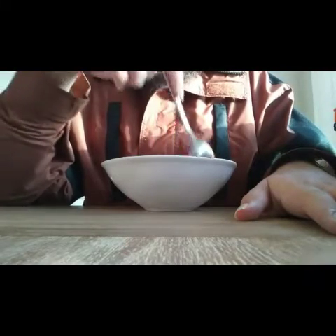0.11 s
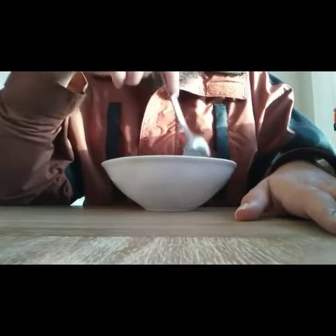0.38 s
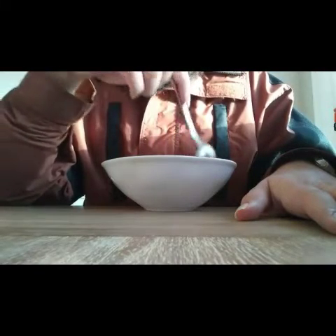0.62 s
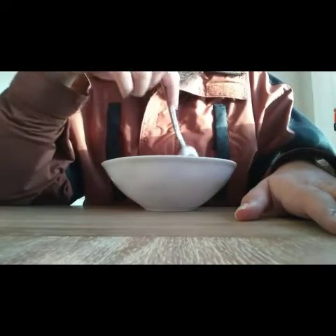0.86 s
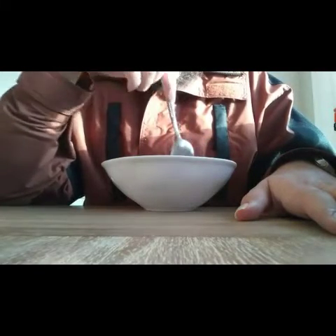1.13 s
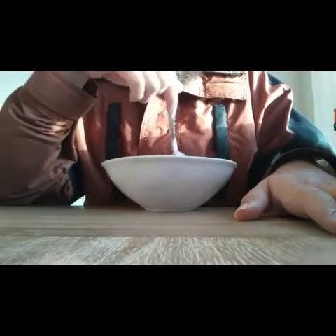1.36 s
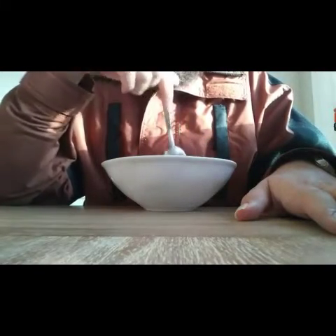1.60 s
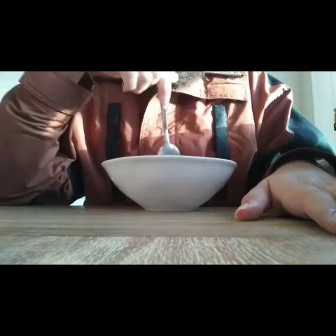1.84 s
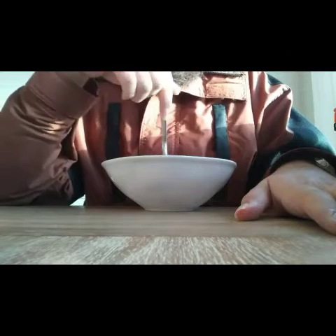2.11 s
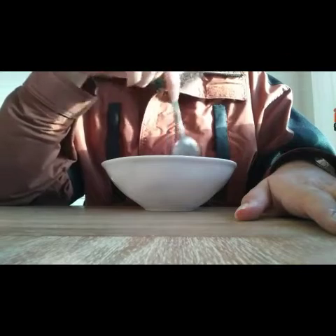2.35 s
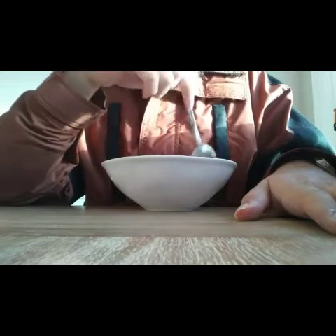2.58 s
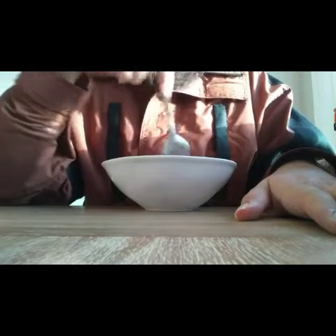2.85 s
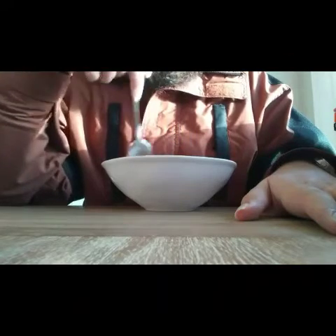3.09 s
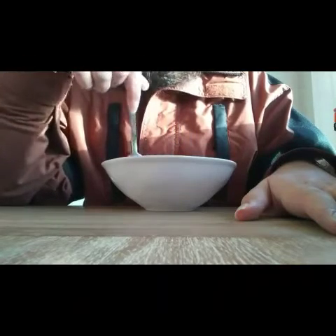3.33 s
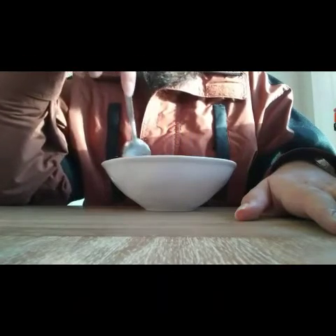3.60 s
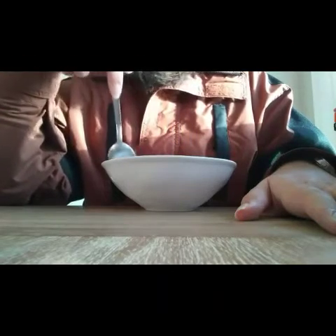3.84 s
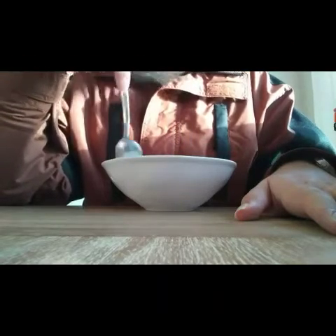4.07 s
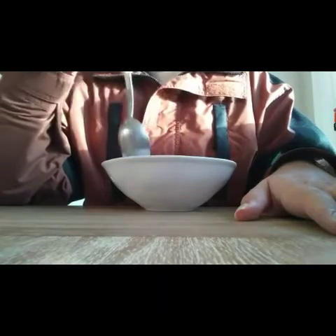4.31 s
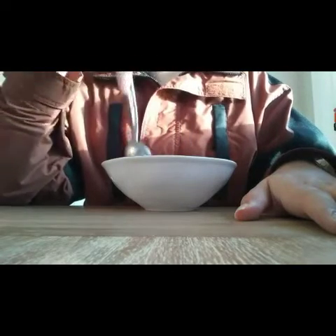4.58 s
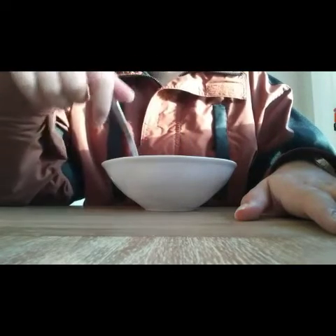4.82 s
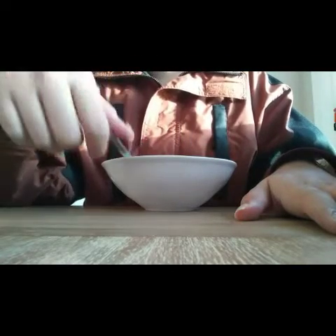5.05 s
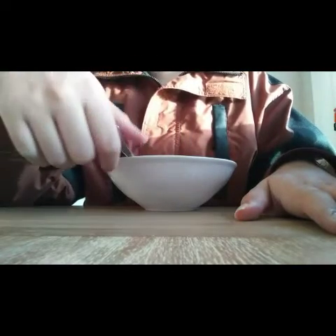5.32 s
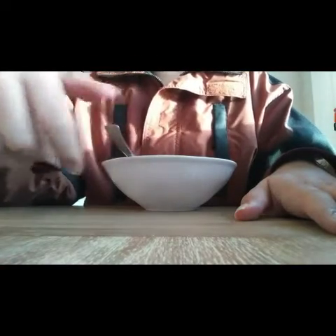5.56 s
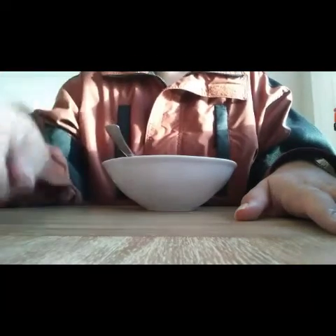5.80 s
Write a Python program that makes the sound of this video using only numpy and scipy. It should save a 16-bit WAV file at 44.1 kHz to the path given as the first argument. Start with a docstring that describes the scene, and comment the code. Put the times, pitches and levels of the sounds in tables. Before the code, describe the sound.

A steel spoon strikes the inside of a ceramic bowl on a wooden table, roughly twice a second at first and then less regularly. Most hits are loud, hard and bright with tiny bounces and a short ring; one early touch is soft and dull. Brief scrapes follow. Near the end the spoon drags, clacks twice as it is let go, and a sleeve rustles. Close microphone, small room, faint hum.

```python
"""In a small room, a steel spoon knocks, bounces and scrapes inside a ceramic bowl on a wooden table.
Impulses excite the bowl's pairs of close modes, which beat, and the resonances of the table below.
Filtered random grains make the friction of spoon and sleeve; narrow noise, gliding or steady, makes
squeals, bowl and spoon ringing on under the drag, and one short bright tick. Echoes are decaying bands
of noise; a faint appliance hum and steady noise fill the room; a limiter holds down the loudest peaks."""
import sys
import numpy as np
from scipy import signal
from scipy.fft import rfft, irfft, next_fast_len
from scipy.io import wavfile
from scipy.ndimage import uniform_filter1d, minimum_filter1d

SR = 44100
rng = np.random.default_rng(int(sys.argv[2]) if len(sys.argv) > 2 else 0)


def undo_db(level):
    """Turn decibels back into plain size, where 20 dB means ten times bigger."""
    steps = np.asarray(level, float) / 20
    return 10 ** steps


def wav_record(signal):
    """Record a signal, one row per channel, as 16-bit PCM in the file named by sys.argv[1]."""
    frames = np.transpose(np.atleast_2d(signal))
    bounded = np.clip(frames, -1, 1)
    # unit amplitude maps onto the largest positive 16-bit level
    quanta = np.round(bounded * 32767).astype(np.int16)
    wavfile.write(sys.argv[1], SR, quanta)


N = 261497


def rms_one(x):
    """Normalisation: scale to unit rms."""
    return x / np.sqrt(np.mean(x ** 2) + 1e-20)


def at_hz(points, hz):
    """Interpolation: read a table on a log-frequency axis."""
    table_hz, values = np.array(points)[:, :2].T
    return np.interp(np.log(hz), np.log(table_hz), values)


def clicks(times, sizes):
    """Impulse excitation: single-sample impulses."""
    out = np.full(N, 1e-18)
    np.add.at(out, np.round(np.asarray(times) * SR).astype(int), sizes)
    return out


def ring(x, hz, t60):
    """Damped resonance: a unit click sets a decaying sine of height 1 ringing."""
    radius, turn = undo_db(-60 / (t60 * SR)), 2 * np.pi * hz / SR
    return signal.lfilter([0, np.sin(turn)], [1, -2 * radius * np.cos(turn), radius ** 2], x)


def coloured(x, spectrum):
    """Spectral shaping: multiply the Fourier spectrum by a table, then scale to rms 1."""
    size = next_fast_len(N)
    hz = np.maximum(np.arange(size // 2 + 1) * SR / size, 1)
    return rms_one(irfft(rfft(x, size) * undo_db(at_hz(spectrum, hz)), size)[:N])


def grains(per_s, spread_db):
    """Shot noise: random contacts of random sign, their sizes spread exponentially in dB."""
    sizes = undo_db(spread_db * np.minimum(rng.exponential(1, N), 5)) * rng.choice([-1, 1], N)
    return rms_one(sizes * (rng.random(N) < per_s / SR))


def chatter(corner_hz, depth_db):
    """Random amplitude modulation: low-passed noise flickers a gain in dB, rms 1."""
    pole = np.exp(-2 * np.pi * corner_hz / SR)
    drift = signal.lfilter([1], [1, -2 * pole, pole * pole], rng.standard_normal(N))
    return rms_one(undo_db(depth_db * rms_one(drift)))


# spectrum of the steady noise: pitch_hz, relative_level_db
NOISE_SPECTRUM = [(18, -73), (30, -35.5), (71, -28.5), (112, -32.5), (127, -16.5), (149, 2), (179, -15),
                  (227, 0.5), (328, -3), (426, -3.5), (600, -13.5), (1100, -12.5), (1280, -15.5),
                  (4420, -26.5), (16000, -40.5)]
# lines of the appliance hum: pitch_hz, resonance_width_hz, level_db (rms)
HUM_LINES = [(149.6, 6.4, -66.5), (218.2, 6.6, -65.5), (286, 13, -66.5), (350.8, 18, -62.5)]
NOISE_DB = -57.5   # rms


def background():
    """Narrow-band noise: hum lines waver as noise passes two equal resonances, over steady noise."""
    out = undo_db(NOISE_DB) * coloured(rng.standard_normal(N), NOISE_SPECTRUM)
    for hz, width_hz, level_db in HUM_LINES:
        t60 = np.log(1000) / (np.pi * width_hz)
        once = ring(rng.standard_normal(N), hz, t60)
        out += undo_db(level_db) * rms_one(ring(once, hz, t60))
    return out


# small ticks: start_s, approximate_peak_db, centre_hz
TICK_EVENTS = [(0.035, -46, 1781), (0.0792, -44.5, 1202), (0.4583, -44, 1670), (0.943, -36, 1010),
               (1.0244, -39, 1690), (1.0439, -41, 2600), (1.2395, -40, 1146), (1.5013, -44.5, 6520),
               (1.707, -42.5, 1410), (1.7165, -40, 5006), (2.4564, -50, 4405), (2.7013, -45, 1870),
               (2.988, -46, 1730), (2.97, -42.5, 1730), (3.1107, -41, 990), (3.497, -41, 4267),
               (4.44, -40.5, 2088), (4.67, -29, 2480), (5.174, -38, 1710), (5.283, -34, 1490)]
TICK_DECAY_S, TICK_CREST_DB = .003, 9   # time to fall to 1/e; peak above rms


def ticks():
    """Transient noise: each tick is an exponentially fading puff around its own pitch."""
    out, t = np.zeros(N), np.arange(SR // 20) / SR
    for start_s, peak_db, hz in TICK_EVENTS:
        band = signal.butter(2, [hz * .6, min(hz * 1.6, .45 * SR)], "band", fs=SR)
        noise = signal.lfilter(*band, rng.standard_normal(len(t)))
        puff = noise / np.std(noise) * np.exp(-t / TICK_DECAY_S)
        out[round(start_s * SR):][:len(t)] += undo_db(peak_db - TICK_CREST_DB) * puff
    return out


# reverberation times of the room: pitch_hz, t60_s
ROOM_DECAY = [(200, .45), (2000, .48), (6000, .41), (10000, .28), (15000, .21)]


def room(x):
    """Diffuse reverberation: half-octave bands of noise, each dying at its own pace."""
    t, tail = np.arange(SR * 2 // 3) / SR, 0
    for low_hz in 100 * 2 ** np.arange(0, 7.5, .5):
        band = signal.butter(2, [low_hz, low_hz * np.sqrt(2)], "band", fs=SR, output="sos")
        noise = signal.sosfilt(band, rng.standard_normal(len(t)))
        tail = tail + noise * undo_db(-60 * t / at_hz(ROOM_DECAY, low_hz))
    tail = tail * np.minimum(t / 0.0013, 1)   # the echoes build up over the first 1.3 ms
    return signal.fftconvolve(x, tail / np.sqrt(np.sum(tail ** 2)))[:N]


# sleeve and hand move: peak_s, swell_s, dull_db, rasp_db, bright_db
RUSTLE_EVENTS = [(.065, 0.12, -58.5, -64.5, -73), (.52, .1, -61.5, -69, -84),
                 (.62, .12, -59.5, -84.5, -91.5), (1.03, .05, -52.5, -62, -80),
                 (1.266, 0.053, -56, -68, -85), (1.501, .008, -63, -59, -77.5),
                 (1.69, .06, -51.5, -65, -77.5), (1.717, 0.0093, -47.5, -54, -65),
                 (2.461, 0.12, -55, -61, -70.5), (2.713, 0.11, -54, -58, -70.5),
                 (3.118, 0.016, -50.5, -57.5, -74.5), (3.95, 0.198, -59, -71.5, -87),
                 (4.151, 0.007, -50, -54.5, -65), (4.443, 0.065, -59, -64.5, -79.5),
                 (5.175, .035, -53.5, -68.5, -91.5), (5.75, 0.132, -65, -64, -68),
                 (5.92, 0.23, -44.5, -44.5, -54.5)]
SWELL_DB, RUSTLE_FALL_DB_PER_S = 19.5, 308.5   # rise within one swell_s; fall after the peak


def rustle_power():
    """Exponential envelopes: each rustle swells and falls along straight lines in dB."""
    t, power = np.arange(N) / SR, np.zeros((3, N))
    for peak_s, swell_s, *levels_db in RUSTLE_EVENTS:
        rise_db = SWELL_DB / swell_s * (t - peak_s)
        shape_db = np.where(t < peak_s, rise_db, RUSTLE_FALL_DB_PER_S * (peak_s - t))
        power += undo_db(np.c_[levels_db] + shape_db) ** 2
    return power


# spectrum of the dull rub: pitch_hz, relative_level_db
RUB_SPECTRUM = [(88, -36.5), (150, -8), (1020, -9), (1640, -8), (2200, -21.5), (2860, -51.5), (4840, -120)]
# spectrum of the rasp: pitch_hz, relative_level_db
RASP_SPECTRUM = [(1180, -30), (2000, -7), (3300, -6.5), (3990, -3), (6000, -13), (7800, -44), (13200, -120)]
# spectrum of the bright hiss: pitch_hz, relative_level_db
HISS_SPECTRUM = [(3240, -27), (5500, -11), (6290, -4.5), (7130, -13), (14200, -10.5), (15500, -23),
                 (16000, -28.5)]


def friction():
    """Power addition: all strokes share three grain voices, dull rub, rasp and bright hiss."""
    gains = np.sqrt(rustle_power() + rattle_power() + scrape_power())
    # a sliding contact keeps breaking
    dull, middle, bright = gains * chatter(90, depth_db=2.8)
    rub = dull * coloured(grains(6000, spread_db=3.5), RUB_SPECTRUM)
    rasp = middle * coloured(grains(6800, spread_db=3.0), RASP_SPECTRUM)
    hiss = bright * coloured(grains(6900, spread_db=0.0), HISS_SPECTRUM)
    return rub + rasp + hiss


# spoon strikes bowl: start_s, crack_db, then db relative to the crack:
# thud_db, ring_1700_hz_db, ring_2900_hz_db, ring_4400_hz_db, ring_6100_hz_db, ring_750_hz_db
BLOW_EVENTS = [(0.223, -2.5, -19.5, -14.5, 4.5, -24, -8.5, -11.5),
               (0.77, -26.5, 3.5, -5, -6, -23, -22.5, -4), (1.5533, -0.5, -23.5, -13, 1.5, -12.5, -17, -17),
               (2.137, 4, -26, -11, -8.5, -16, -12, -19), (2.7688, -1, -30.5, -13.5, 5.5, -12, -7.5, -15),
               (3.3256, 1, -20, -14, 7.5, -12.5, 0, -16), (3.9761, -6.5, -26.5, -7, 1, -20, -11, -6.5),
               (4.582, -0.5, -28, -15, -6.5, -28.5, -19.5, -15.5),
               (5.2901, -1, -26, -24, -14.5, -32, -20, -18),
               (5.3656, -11.5, -21, -16, -17, -30, -16.5, -12.5)]
# further touches where the nearest blow fell: start_s, crack_db, thud_db (relative to the crack),
# ring_db (added to the blow's ring columns)
BOUNCE_EVENTS = [(0.2193, -10, -26, -13), (0.2445, -11.5, -16, -1), (0.2995, -24, -16, -20),
                 (0.3182, -29.5, -11, -12.5), (0.3504, -27.5, -8, -22), (0.78, -28, 4.5, -2),
                 (0.8092, -22.5, -10, -17), (0.8232, -31, 3.5, -9.5), (0.849, -35, 0, -17),
                 (0.884, -27, -18.5, -18), (1.564, -8.5, -22, -1), (2.1474, -5, -32, -10),
                 (2.2095, -24, -11, 3), (2.782, -10, -21.5, -10.5), (3.3426, 2, -30.5, 2.5),
                 (3.3824, -11.5, -21.5, -17.5), (4.153, -38, -3.5, -27.5), (4.5991, -19, -21.5, 13.5),
                 (4.6126, -18.5, -32, -6), (5.3, -11, -10, 6), (5.374, -18, -21.5, -4),
                 (5.3835, -21.5, -21.5, -4.5)]
TOP_RINGS_DB = -23.5   # rings from 8 kHz up, relative to the 6.1 kHz ring
BOUNCE_TOP_DB = -7   # further touches wake the rings from 8 kHz up less


def contacts():
    """Modal excitation: rows of start_s, crack_db, thud_db, rings at 1.7, 2.9, 4.4, 6.1, 8 up, 0.75 kHz."""
    blows, bounces = np.array(BLOW_EVENTS), np.array(BOUNCE_EVENTS)
    blows = np.insert(blows, -1, blows[:, -2] + TOP_RINGS_DB, axis=1)
    nearest = blows[np.argmin(abs(bounces[:, :1] - blows[:, 0]), axis=1)]
    nearest[:, -2] += BOUNCE_TOP_DB
    bounce_rings = nearest[:, -6:] + bounces[:, -1:]
    return np.vstack([blows, np.column_stack([bounces[:, :-1], bounce_rings])])


# broad resonances of the crack: pitch_hz, relative_level_db, t60_s,
# contact column it follows (rounded, 0 for none)
CRACK_RESONANCES = [(1450, -11.5, 0.0039, -0.5), (2560, -11.5, 0.006, 0.5), (3743, -17.5, 0.0095, 0.5),
                    (4566, 1, .01, 5.5), (5430, -16, 0.0042, 0.5), (8130, 0.5, 0.011, 7),
                    (8917, -1.5, .008, 7), (12037, -3.5, .008, 7)]


def crack():
    """Filtered noise burst: micro-contacts excite broad, fast-dying resonances."""
    rows, out = contacts(), np.zeros(N)
    for hz, level_db, t60, column in CRACK_RESONANCES:
        colour_db = rows[:, round(column)] if round(column) else 0
        blows = clicks(rows[:, 0], undo_db(rows[:, 1] + colour_db + level_db - 10))
        burst = signal.lfilter([1], [1, -.985], blows) * rng.standard_normal(N)
        out += ring(burst, hz, t60)
    return out


# the bowl's mode pairs: lower_hz, upper_twin_hz
MODE_PAIRS = [(746, 757), (1640, 1676), (2859, 2885), (4347, 4381), (6083, 6094), (8010, 8090),
              (10238, 10268), (11950, 11965), (12640, 12652), (14120, 14140), (15250, 15262)]
# the same pairs: relative_level_db, t60_s, twin_t60_s, signed share of twin (-1 to 1),
# room_send_db, contact column that drives it
MODE_SETTINGS = [(-16, 0.11, .15, 0.63, -10.5, 8), (-5, 0.083, 0.14, -0.55, -18.5, 3),
                 (-6.5, 0.083, 0.033, -0.4, -21.5, 4), (-2.5, 0.1, 0.34, -0.064, -9, 5),
                 (-10, 0.084, 0.14, -0.073, -18, 6), (-5, 0.097, 0.063, 0.4, -10, 7),
                 (-2, 0.14, 0.06, 0.089, -12.5, 7), (-18.5, 0.061, 0.13, -.3, -10, 7),
                 (-7.5, 0.06, .13, -0.087, -10, 7), (-22.5, .13, .13, -0.27, -11, 7),
                 (-6.5, 0.06, 0.088, -0.29, -9.5, 7)]
CONTACT_T60_S = .008   # the push on each mode builds over the first milliseconds


def bowl():
    """Beating of split modes: each contact strikes both twins; returns direct sound and room feed.

    Twins that start out of step swell first, then beat."""
    rows, out, sent = contacts(), np.zeros(N), np.zeros(N)
    for (hz, twin_hz), settings in zip(MODE_PAIRS, MODE_SETTINGS):
        level_db, t60, twin_t60, share, sent_db, column = settings
        blows = clicks(rows[:, 0], undo_db(rows[:, 1] + rows[:, round(column)] + level_db + 6.5))
        push = 2 * (1 - undo_db(-60 / (CONTACT_T60_S * SR))) * ring(blows, hz, CONTACT_T60_S)
        pair = (1 - abs(share)) * ring(push, hz, t60) + share * ring(push, twin_hz, twin_t60)
        out += pair
        sent += undo_db(sent_db) * pair
    return out, sent


# resonances of table top and bowl foot: pitch_hz, relative_level_db, t60_s
TABLE_MODES = [(249, -3, 0.036), (296, -7.5, 0.048), (367.5, -3, 0.15), (445, -8, 0.14), (562, -0.5, 0.03),
               (725, -9.5, 0.026), (962, -18.5, 0.16), (1140, -21.5, 0.027)]


def table():
    """Structure-borne sound: the foot of the bowl passes each contact on to the wood, softened."""
    rows, out = contacts(), np.zeros(N)
    blows = clicks(rows[:, 0], undo_db(rows[:, 1] + rows[:, 2] + 4.0))
    push = signal.lfilter([.15], [1, -.85], blows)
    for k, (hz, level_db, t60) in enumerate(TABLE_MODES):
        out += (-1) ** k * undo_db(level_db) * ring(push, hz, t60)   # neighbours alternate in sign
    return out


# dull, rasp and bright voices, relative to crack_db, with their rates of fall
RATTLE_DB, RATTLE_FALL_DB_PER_S, RATTLE_DELAY_S = (-31, -26, -48.5), 698, 0.0036
WASH_DB, WASH_FALL_DB_PER_S = (-44, -53, -64.5), (120, 128.5, 143)


def rattle_power():
    """Two-rate decay: every contact rattles briefly, then leaves a longer wash."""
    t, power = np.arange(N) / SR, np.zeros((3, N))
    for start_s, crack_db in contacts()[:, :2]:
        first = round((start_s + RATTLE_DELAY_S) * SR)
        age = t[:min(SR, N - first)]
        rattle = undo_db(crack_db + np.c_[list(RATTLE_DB)] - RATTLE_FALL_DB_PER_S * age)
        wash = undo_db(crack_db + np.c_[list(WASH_DB)] - np.c_[list(WASH_FALL_DB_PER_S)] * age)
        power[:, first:first + len(age)] += rattle ** 2 + wash ** 2
    return power


# narrow tones: the spoon squeals, or bowl and spoon ring on under the drag; the last is a short
# bright tick: start_s, end_s, start_hz, end_hz, width_hz
NARROW_TONES = [(.25, .42, 1680, 1660, 60), (.224, .39, 4100, 3950, 300), (1.062, 1.095, 6500, 6500, 150),
                (2.17, 2.28, 4350, 4350, 30), (2.2, 2.29, 2870, 2870, 40), (4.68, 4.85, 760, 740, 60),
                (4.86, 5.03, 700, 670, 40), (4.7, 4.91, 1665, 1638, 35), (4.74, 4.84, 2600, 2350, 200),
                (4.835, 4.99, 2320, 2200, 70), (4.78, 4.9, 4350, 4300, 200), (4.835, 4.98, 3950, 3750, 120),
                (4.74, 4.84, 5000, 5250, 250), (5.37, 5.5, 4750, 4500, 250),
                (5.782, 5.796, 10600, 10600, 1200)]
# the same tones: level_db (rms before the fade in and out)
NARROW_TONE_LEVELS = [-45, -47, -59.5, -38, -42, -54, -50, -45, -55.5, -54, -57, -58, -61, -63.5, -56]


def narrow_tones():
    """Narrow-band resonance: noise around a gliding or steady pitch squeals, rings on or briefly ticks."""
    out, t = np.zeros(N), np.arange(N) / SR
    for (start_s, end_s, start_hz, end_hz, width_hz), level_db in zip(NARROW_TONES, NARROW_TONE_LEVELS):
        inside = (t >= start_s) & (t < end_s)
        along = (t[inside] - start_s) / (end_s - start_s)
        noise = rng.standard_normal(inside.sum()) + 1j * rng.standard_normal(inside.sum())
        wobble = signal.lfilter([1], [1, -np.exp(-np.pi * width_hz / SR)], noise)
        turns = np.cumsum(start_hz + (end_hz - start_hz) * along) / SR
        tone = rms_one((wobble * np.exp(2j * np.pi * turns)).real)
        out[inside] += undo_db(level_db) * np.sqrt(np.sin(np.pi * along)) * tone
    return out


# the spoon drags on the glaze: start_s, length_s, dull_db, rasp_db, bright_db
SCRAPE_EVENTS = [(0.231, .07, -47.5, -41.5, -45), (.317, 0.05, -50, -40.5, -50),
                 (0.766, 0.092, -43, -49.5, -52.5), (1.064, 0.022, -51, -54, -62),
                 (2.198, 0.051, -36.5, -52.5, -71), (2.829, 0.29, -55, -59, -71),
                 (3.379, 0.068, -44.5, -40.5, -55.5), (3.99, .08, -54.5, -56, -65),
                 (4.598, 0.018, -45.5, -33, -54), (4.7, .26, -55.5, -56.5, -68)]


def scrape_power():
    """Piecewise envelope: a 5 ms onset, a sag of 6 dB along the drag, then a steep release."""
    t, power = np.arange(N) / SR, np.zeros((3, N))
    for start_s, length_s, *levels_db in SCRAPE_EVENTS:
        end_s = start_s + length_s
        shape_db = np.interp(t, [start_s - .005, start_s, end_s, end_s + 1], [-60, 0, -6, -400])
        power += undo_db(np.c_[levels_db] + shape_db) ** 2
    return power


THUD_ROOM_DB, KNOCK_ROOM_DB = -10, -19.5   # sent to the room
BASS_CUT_HZ = 265


def scene():
    """Superposition: bowl, table and their echoes add to the friction and the background."""
    (rings, sent), thud, knocks = bowl(), table(), crack() + ticks()
    echoes = room(sent + undo_db(THUD_ROOM_DB) * thud + undo_db(KNOCK_ROOM_DB) * knocks)
    # a bowl radiates little deep bass
    small_body = signal.butter(2, BASS_CUT_HZ, "high", fs=SR, output="sos")
    impacts = signal.sosfilt(small_body, rings + thud + knocks + echoes)
    tones = narrow_tones() * chatter(40, depth_db=3)
    return (impacts + tones + friction() + background())[None]


def low_pass(x):
    """Removes everything above the highest recorded frequency."""
    return signal.sosfilt(signal.butter(12, 16550, fs=SR, output="sos"), x)


TOP_CUT_HZ, CEILING_DB, RELEASE_DB_PER_S = 17000, -2, 304


def record(dry):
    """Peak limiting: the microphone fades at the very top; a fast limiter ducks what passes the ceiling."""
    dry = signal.sosfilt(signal.cheby2(8, 40, TOP_CUT_HZ, fs=SR, output="sos"), dry)
    ramp = RELEASE_DB_PER_S * np.arange(N) / SR
    over_db = np.maximum(20 * np.log10(abs(dry) + 1e-9) - CEILING_DB, 0)
    held_db = np.maximum.accumulate(over_db + ramp, axis=1) - ramp
    # a sliding maximum looks ahead, so that the smoothed gain is down in time
    ahead_db = -minimum_filter1d(-held_db, size=41, axis=1)
    mix = dry * undo_db(-uniform_filter1d(ahead_db, size=41, axis=1))
    return low_pass(mix)


dry = scene()
out = record(dry)
wav_record(out)
```